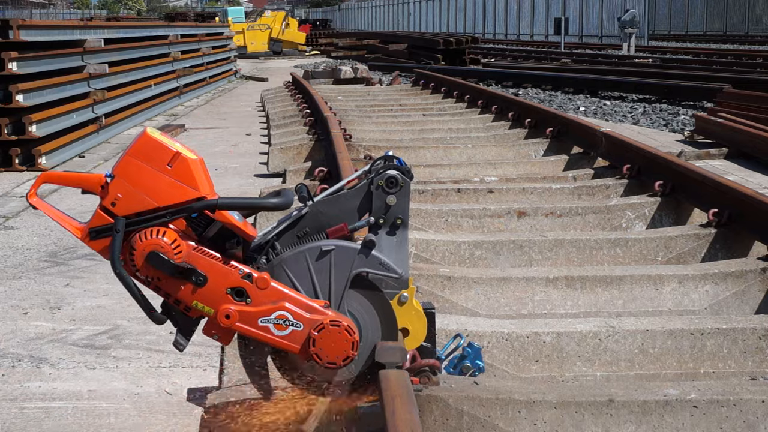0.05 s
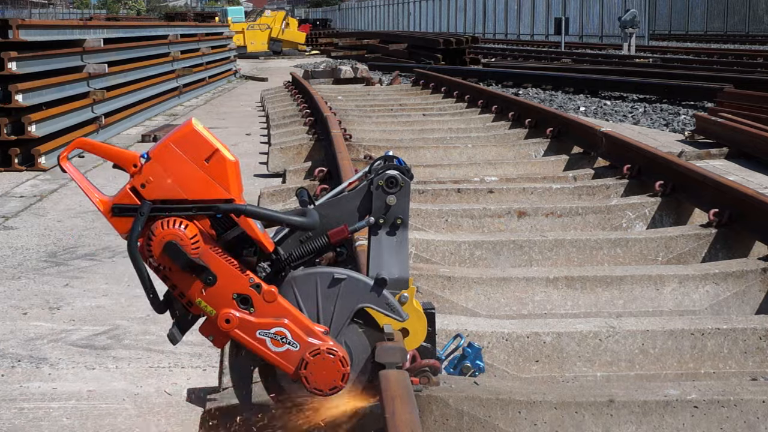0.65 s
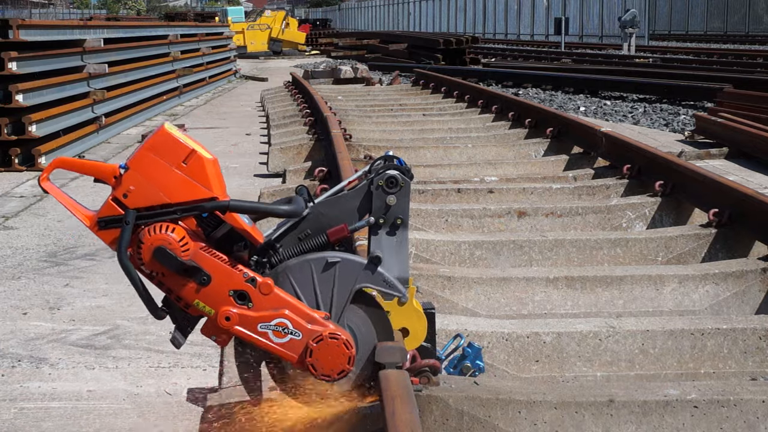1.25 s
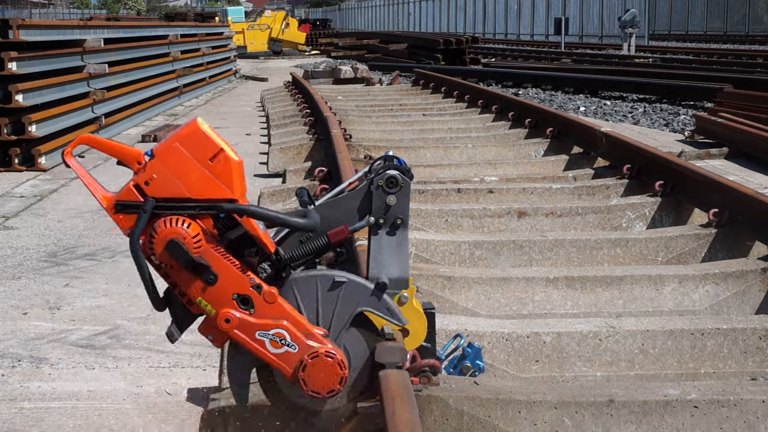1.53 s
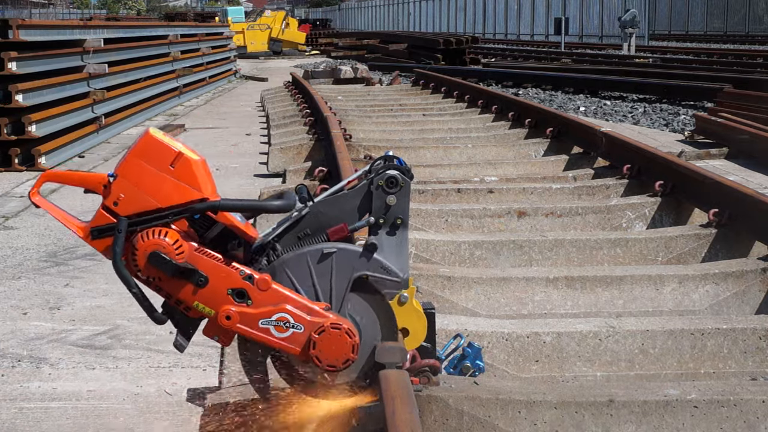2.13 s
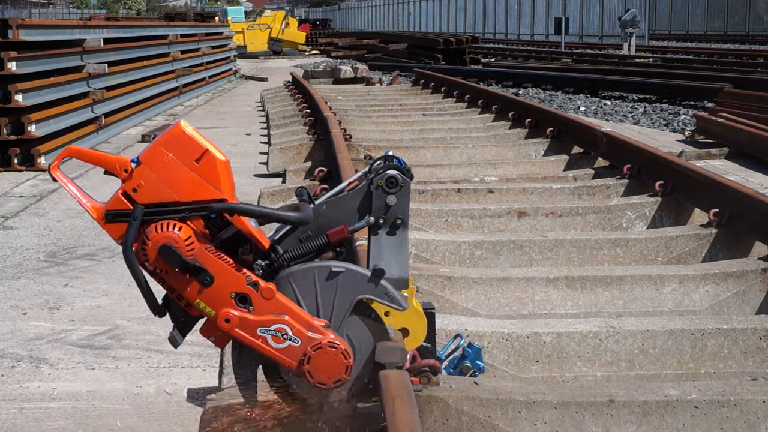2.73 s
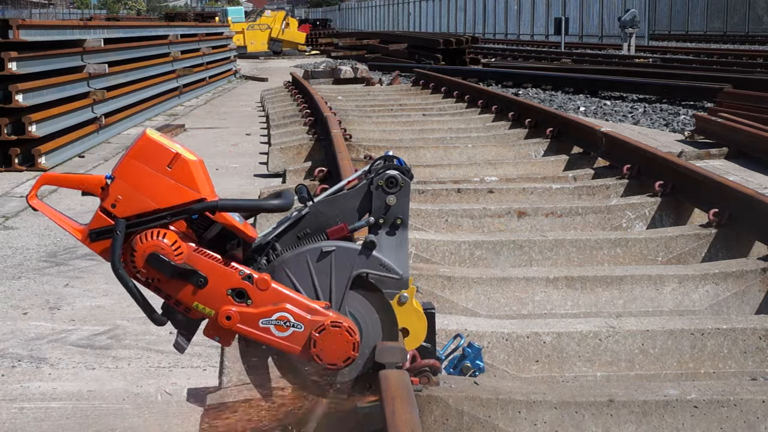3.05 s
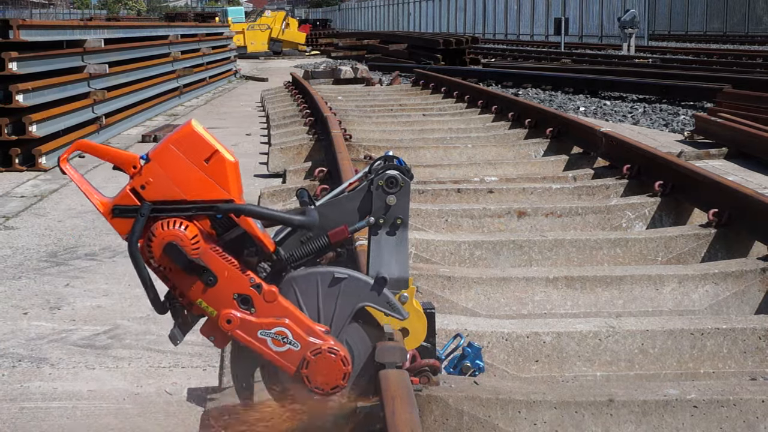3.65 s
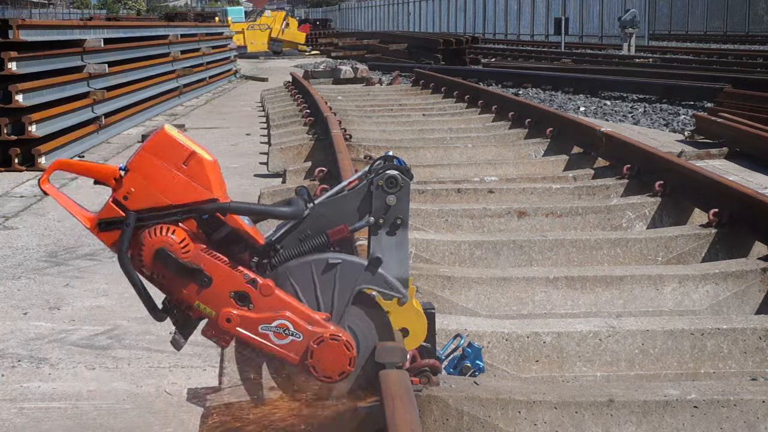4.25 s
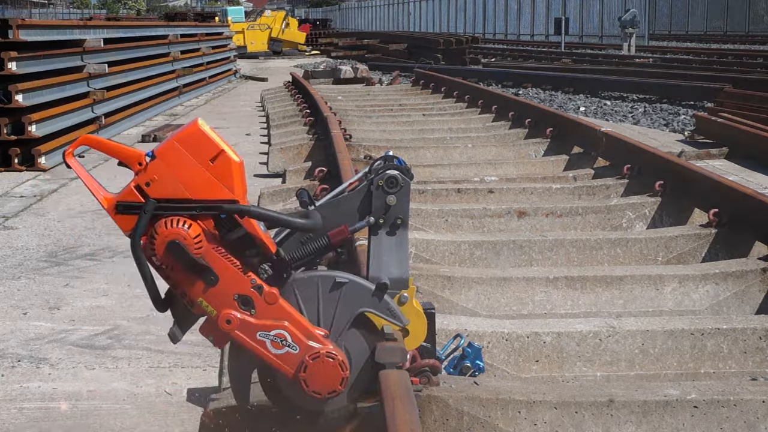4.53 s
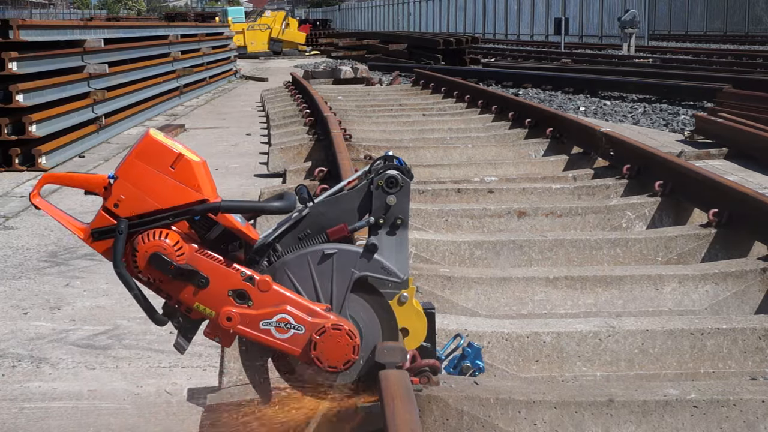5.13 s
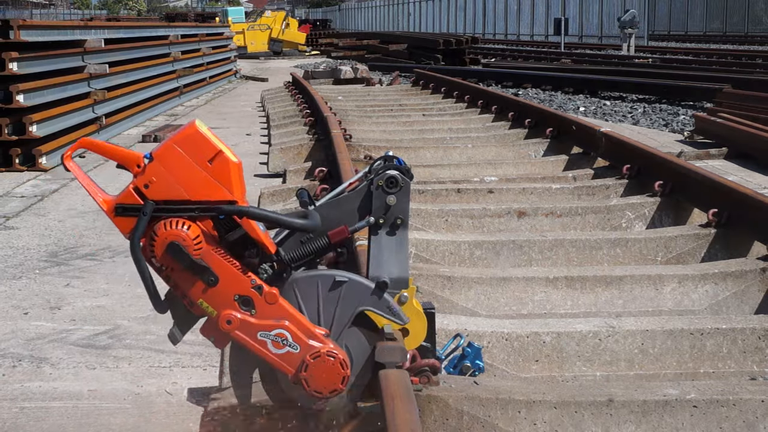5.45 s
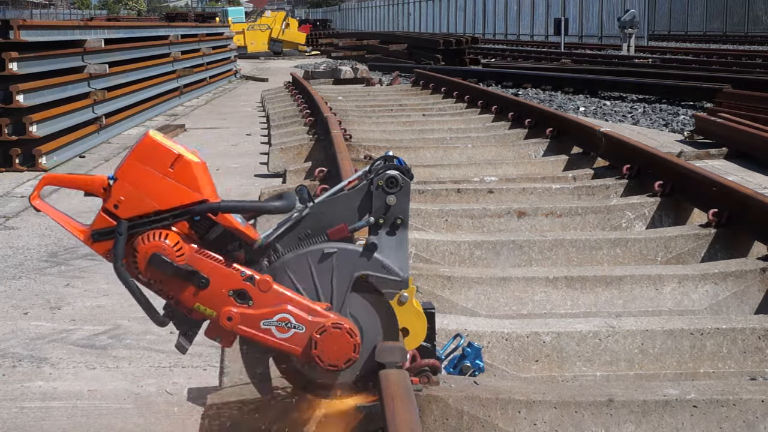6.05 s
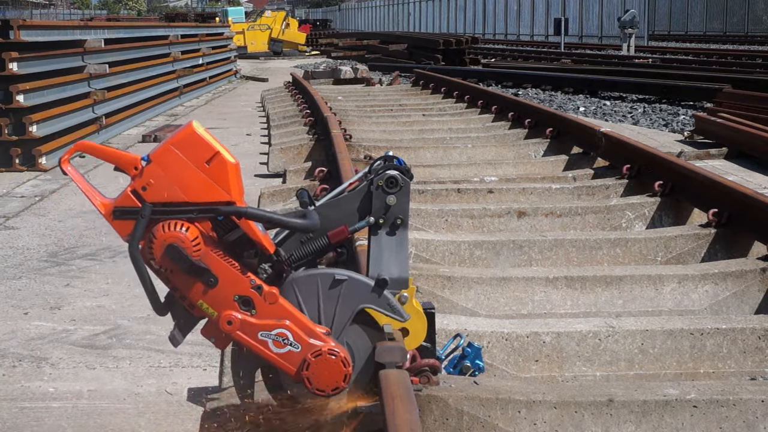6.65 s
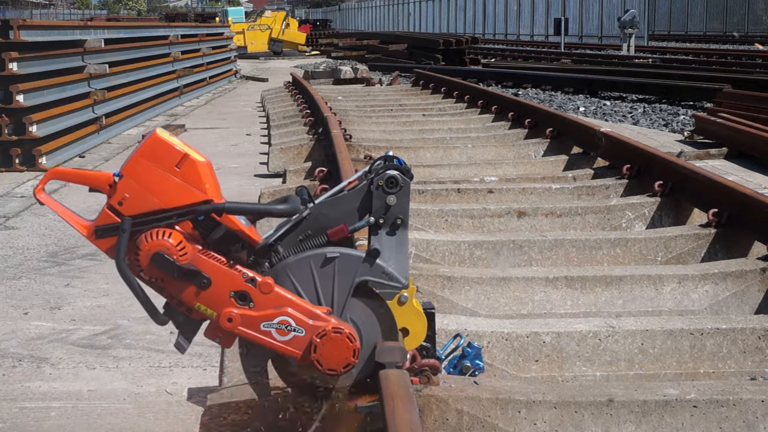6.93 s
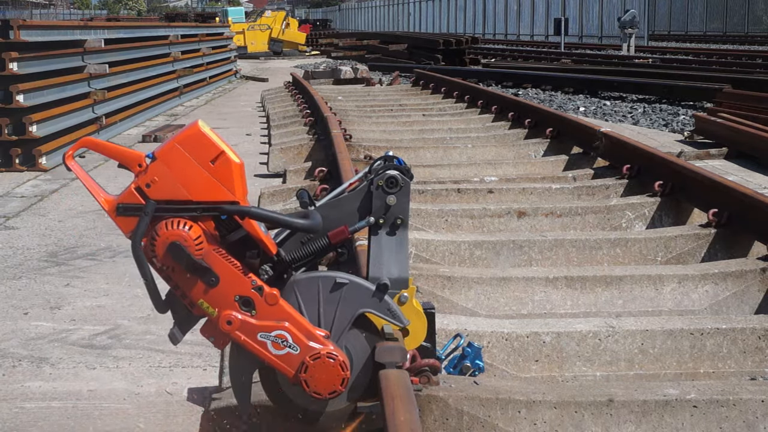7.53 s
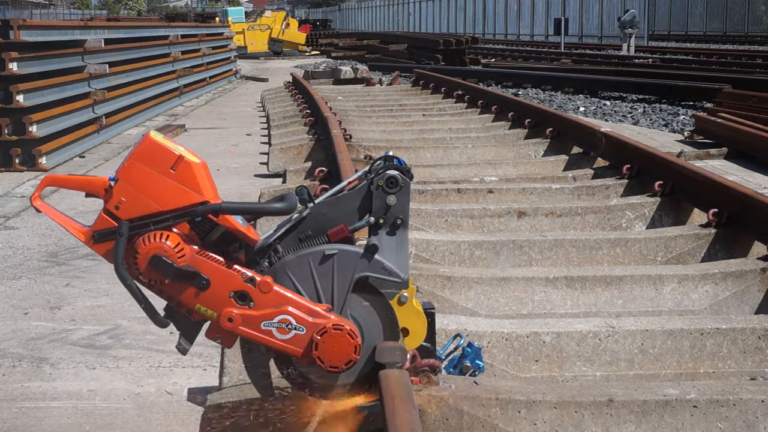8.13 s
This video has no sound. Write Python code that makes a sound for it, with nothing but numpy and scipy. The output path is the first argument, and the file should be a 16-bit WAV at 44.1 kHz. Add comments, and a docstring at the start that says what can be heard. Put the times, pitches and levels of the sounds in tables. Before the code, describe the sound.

A petrol rail saw runs at full throttle outdoors, its disc grinding through steel with a harsh hiss and brief squeals.

```python
"""Outdoors, a pair of microphones faces a two-stroke rail saw, a little to the left, with no echo.
It runs at full throttle while its abrasive disc is rocked through a steel rail, about a stroke a second.
The engine sags as the disc bites and picks up as it eases; each firing puffs gas through the muffler
and rattles the casing. The disc hisses, spits grit and sets the steel ringing, and now and then it
squeals against the wall of the cut. A faint open-air rumble lies underneath."""
import sys
import numpy as np
from scipy import signal
from scipy.fft import rfft, irfft
from scipy.io import wavfile

SR = 44100
rng = np.random.default_rng(int(sys.argv[2]) if len(sys.argv) > 2 else 0)


def output_pcm(signal):
    """Save a mono or channel-first signal as 16-bit PCM at the path in sys.argv[1].

    Samples are clipped to [-1, 1] before scaling.
    """
    pcm = np.clip(np.atleast_2d(signal).T, -1, 1) * 32767
    wavfile.write(sys.argv[1], SR, np.round(pcm).astype(np.int16))


N = 370440
TIME = np.arange(N) / SR
BIN_HZ = np.maximum(np.arange(N // 2 + 1) * SR / N, 1)
SIDES = np.array([[1], [-1]])   # left, right
STROKE_S, EASE_AT_S = 1.013, 0.396   # one rock to and fro; a moment when the disc eases off the rail


def from_db(db):
    """Decibels to gain."""
    return 10 ** (np.asarray(db) / 20)


def unit_rms(x):
    """Scale to unit power."""
    return x / np.sqrt(np.mean(x ** 2) + 1e-20)


def in_time(points):
    """Read a curve at every sample."""
    return np.interp(TIME, *np.transpose(points))


def at_bins(points):
    """Read a spectrum at every bin, on a log-frequency axis."""
    hz, value = np.transpose(points)
    return np.interp(np.log(BIN_HZ), np.log(np.maximum(hz, 1)), value)


def drift(rate_hz):
    """A smooth random curve of spread 1 that wanders up to about rate_hz."""
    count = N // 20
    hz = np.arange(count // 2 + 1) * SR / N
    slow = irfft(rfft(rng.standard_normal(count)) / (1 + (hz / rate_hz) ** 2), count)
    return np.interp(np.arange(N) / 20, np.arange(count), unit_rms(slow))


def swells(rows):
    """A bell-shaped rise or dip in dB around each event."""
    return sum(db * np.exp(-((TIME - s) / width) ** 2) for s, width, db in rows)


def sway(swing_db, lag, count=1):
    """Rise and fall in dB, count times a stroke, highest lag strokes after the disc eases."""
    return swing_db * np.cos(2 * np.pi * count * ((TIME - EASE_AT_S) / STROKE_S - lag))


def puffs(turns, lag, sharpness):
    """One smooth swell a turn, highest lag of the way round."""
    return unit_rms(np.exp(sharpness * np.cos(2 * np.pi * (turns - lag))))


def resonances(modes):
    """Frequency response of parallel resonances with alternating signs."""
    return sum((-1) ** k * from_db(db) / (1 + 1j * hz / width * (BIN_HZ / hz - hz / BIN_HZ))
               for k, (hz, width, db) in enumerate(modes))


# Balance across the pair. Each row: frequency in Hz, left microphone over right in dB.
MIC_BALANCE = [(60, 1), (150, 1), (450, 1), (600, 3), (1000, 1.5), (1700, 3), (2200, 1), (2500, 2.5),
               (2900, 0), (3500, 3), (5100, 5), (11000, 5)]
# Phase across the pair. Each row: frequency in Hz, lead of the left microphone in radians.
MIC_LEAD = [(0, 0.32), (260, -0.54), (860, -0.66), (2500, -0.5), (3190, 1), (3700, 0.21), (4820, 0.79),
            (5170, 0.12), (5860, 1), (6890, 0.16), (9990, 0.5), (11600, -0.15)]

def at_microphones(spectrum):
    """The saw stands to the left: each microphone hears it with its own level and phase."""
    gain = from_db(SIDES * at_bins(MIC_BALANCE) / 2)
    phase = np.exp(.5j * SIDES * at_bins(MIC_LEAD))
    return irfft(spectrum * gain * phase, N)


# How alike noise is at the two microphones. Each row: frequency in Hz, likeness from 0 to 1.
MIC_LIKENESS = [(60, 0.28), (160, 0.91), (400, 0.74), (1000, 0.89), (2700, 0.67), (4400, 0.6), (7000, 0.51),
                (11000, 0.37)]

def radiate(drive, response):
    """Noise, shaped in time by drive and in colour by response, reaches the pair at unit power."""
    mid, side = rfft(rng.standard_normal((2, N)) * drive)
    alike = at_bins(MIC_LIKENESS)
    pair = np.sqrt(1 + alike) * mid + np.sqrt(1 - alike) * side * SIDES
    return unit_rms(at_microphones(response * pair))


# Speed held against the feed, sinking as the cut deepens. Each row: time in seconds, firings a second.
FEED_SPEED = [(0, 149.3), (.73, 152), (.8, 150.2), (.99, 151.4), (1.52, 152), (1.83, 148.2), (2.14, 148.2),
              (2.7, 149.8), (2.79, 147.2), (3.06, 148.9), (3.66, 149.9), (3.8, 148.5), (4.15, 147.9),
              (4.65, 148.7), (5.2, 147.6), (5.65, 148.8), (5.82, 147.9), (6.65, 147.8), (6.8, 145.6),
              (8.4, 145.5)]

def crank_speed(lift_hz, ease_s, hunt_hz, hunt_rate_hz):
    """Firings per second: held down by the feed, lifted as the disc eases, and hunting a little."""
    from_ease_s = (TIME - EASE_AT_S + STROKE_S / 2) % STROKE_S - STROKE_S / 2
    easing = np.exp(-(from_ease_s / ease_s) ** 2)
    hunting = np.sin(2 * np.pi * hunt_rate_hz * TIME + drift(2.09))
    return in_time(FEED_SPEED) + lift_hz * easing + hunt_hz * hunting


LOAD_SPEEDS_HZ = (145.8, 148.8, 151.6)   # labouring, cutting steadily, running light
# The engine note. Each row: multiple of the firing rate, then level in dB at each of those three loads.
ENGINE_ORDERS = [(1.002, -50.0, -53.5, -51.5), (2.001, -45.0, -45.5, -39.5), (2.998, -33, -35.5, -35.5),
                 (4, -28.0, -27, -29.0), (5, -29, -35.5, -32.5), (6.004, -37.5, -44, -39.0),
                 (6.985, -35, -40.5, -42.5), (7.985, -35.5, -33, -29.5), (9.025, -41, -39.5, -43),
                 (10, -46, -37, -34), (11, -36.5, -25.5, -30.5), (12, -30.5, -29, -27),
                 (12.95, -38, -36.5, -41), (14, -46, -38, -31), (14.98, -37, -40, -36),
                 (16, -39.0, -48, -26), (17, -35.5, -42.5, -35), (18.1, -39, -41, -26),
                 (20, -33.5, -35, -41.0), (21, -38, -41, -50), (22, -41.5, -36.5, -39), (23, -41, -37, -39),
                 (24, -41, -44, -41.0), (25.02, -48, -37.5, -39), (25.95, -42.5, -38, -42),
                 (27.1, -40, -45, -43.0), (27.94, -46.0, -43, -44), (29.1, -44.0, -44.0, -43),
                 (30, -44.0, -45.0, -39.5), (30.8, -48, -47, -44), (32, -55, -47, -48.0),
                 (33, -48, -53.0, -55), (34.05, -49.0, -43, -43)]
HIGH_WHINE = (19, -27.5, -29.3, -35.5)   # one more such row, held by a ring of the saw
# Orders swell and fade as the engine tilts. Each row: multiple, swing in dB, lag in strokes.
ORDER_SWAYS = [(2, 1.6, 0.63), (3, 1.7, 0.64), (4, .6, .67), (6, 0, 0.84), (8, 3.5, 0.2), (9, 2, 0.64),
               (10, 0, .15), (11, 1.1, .7), (12, 0.7, 0.25), (13, 2, .1), (16, 1, 0.97), (17, 1.4, .06),
               (19, 2.3, .27), (20, 2, .1), (26, 2, .05)]
# The whine of the order that meets a ring of the casing. Each row: time in seconds, gain in dB.
WHINE_GAIN = [(0, 0.5), (1.7, -3), (2.1, -2), (3.1, -1.5), (3.6, 2.5), (4.1, -12), (4.5, 0.5), (5.6, 2.7),
              (6.1, 1.5), (6.6, 0), (8.4, -2)]
# A hard bite chokes the high orders. Each row: centre in seconds, half-length in seconds, gain in dB.
STUMBLES = [(.85, 0.045, -0.5), (2.79, 0.025, -3), (4.19, .035, -4)]

def engine_note(speed, turns, punch, whine_order, jitter_turns):
    """Harmonics of the firing pulse follow load and stroke; uneven firings roughen the high ones."""
    sways_db = {k: sway(swing_db, lag) for k, swing_db, lag in ORDER_SWAYS}
    sways_db[whine_order] += in_time(WHINE_GAIN)
    angle = 2 * np.pi * (turns + jitter_turns * drift(60))
    firing_db = 20 * np.log10(punch) + swells(STUMBLES)
    note = np.zeros(N)
    for k, *load_db in ENGINE_ORDERS + [HIGH_WHINE]:
        roughness = min(k / 10, 1)   # the low orders stay firm and clean
        db = np.interp(speed, LOAD_SPEEDS_HZ, load_db) + sways_db.get(k, 0)
        waver = np.interp(db, (-38, -28), (2.6, .8))   # weak orders waver, strong ones sing steadily
        db += roughness * firing_db + waver * np.sqrt(roughness) * drift(4)
        phase = 2.2 * rng.standard_normal()
        note += np.sqrt(2) * from_db(db) * np.cos(k * angle + phase)
    return at_microphones(rfft(note))


# The roar at the muffler. Each row: time in seconds, level in dB before the roar's gain.
ROAR_LEVEL = [(0, -24.5), (.2, -24), (.35, -26.5), (1.1, -25.5), (2.3, -26), (3.2, -26), (4.2, -25),
              (4.45, -26.8), (5, -26), (6.15, -24.4), (6.8, -26), (8.4, -25)]
# Colour of the gas. Each row: frequency in Hz, relative level in dB.
GAS_SPECTRUM = [(120, -50), (220, -32), (330, -15.5), (520, -8.5), (760, -1), (900, -1), (1030, 2.5),
                (1250, -0.5), (1480, -6), (2000, -5), (3000, -14.5), (6000, -35)]

def exhaust_gas(turns, strain, roar_gain_db, rush_db, flutter_db, split_hz):
    """Each opening of the exhaust port lets out a puff of turbulent gas: a low roar, a brighter rush."""
    colour = from_db(at_bins(GAS_SPECTRUM))
    low_share = 1 / (1 + (BIN_HZ / split_hz) ** 8)
    flow = puffs(turns, lag=0.19, sharpness=0.54)
    roar = radiate(flow * from_db(flutter_db * drift(23)), colour * np.sqrt(low_share))
    rush = radiate(flow * strain, colour * np.sqrt(1 - low_share))
    return from_db(in_time(ROAR_LEVEL) + roar_gain_db) * roar + from_db(rush_db) * rush


# Rings of the casing. Each row: frequency in Hz, width in Hz, relative level in dB.
CASING_MODES = [(1638, 21, 6), (1808, 90, -0.5), (2113, 89, -0.5), (2440, 106, -2), (2660, 99, -4.5),
                (2677, 320, -2), (3010, 140, -11)]

def casing_rattle(turns, strain, level_db):
    """The firings knock the muffler shell and the covers into a short ring."""
    knocks = puffs(turns, lag=0, sharpness=1.3) * strain
    return from_db(level_db) * radiate(knocks, resonances(CASING_MODES))


# Pressure of the disc on the rail. Each row: time in seconds, base level of hiss and rings in dB.
BITE_LEVEL = [(0, -24), (.5, -25), (1.1, -25.4), (2.1, -25), (2.4, -24.5), (3.5, -24.1), (4, -24.5),
              (4.4, -26), (4.75, -25), (5.5, -25.5), (6.15, -25.5), (6.4, -24.5), (7.2, -24.5), (7.5, -24),
              (7.9, -25), (8.4, -24)]
# Colour of the hiss at the cut. Each row: frequency in Hz, relative level in dB.
HISS_SPECTRUM = [(700, -28.5), (1500, -8), (2400, -0.5), (3300, -3), (4200, 0), (4900, -3), (5600, -2),
                 (6400, -5), (7300, -4.5), (8300, -9), (9700, -7), (11200, -14.5)]
# Three ringing bands of the steel. Each row: frequency in Hz, width in Hz, relative level in dB.
LOW_RING = [(3370, 440, 1.5), (3716, 130, -1), (3897, 140, -2.5)]
MID_RING = [(5180, 150, 0), (5520, 380, 0)]
HIGH_RING = [(6940, 430, -1), (7100, 290, 1.5)]
# The disc's edge catches and the high ring sizzles.
# Each row: centre in seconds, half-length in seconds, gain in dB.
SIZZLES = [(.88, .05, 11), (1.3, .07, 6), (2.05, .1, 5), (3.97, 0.067, 6), (4.63, .07, 3), (4.92, .1, 8),
           (5.42, .12, 3), (6.4, .13, 2), (6.98, .06, 7), (7.42, 0.081, 8)]

def grinding(turns, belt_ratio, hiss_gain_db, ring_gains_db, wander_db):
    """Grains tear at the rail, a little harder once a turn of the belt-driven disc and at each firing."""
    judder_db = 0.45 * drift(8.4)
    bite_db = in_time(BITE_LEVEL) + judder_db + sway(0.36, lag=0.46, count=2)   # bites out and back
    throb = puffs(turns * belt_ratio, lag=0, sharpness=0.031)
    surge = puffs(turns, lag=0.15, sharpness=0.12)
    chatter_db, grit_db = 0.99 * drift(34), 0.86 * drift(700)
    contact = throb * surge * from_db(chatter_db + grit_db)
    cut = from_db(bite_db + hiss_gain_db) * radiate(contact, from_db(at_bins(HISS_SPECTRUM)))
    flares_db = (sway(1.8, lag=0.66), sway(1.0, lag=.2), swells(SIZZLES))
    for modes, gain_db, flare_db in zip((LOW_RING, MID_RING, HIGH_RING), ring_gains_db, flares_db):
        ring_db = bite_db + gain_db + flare_db + wander_db * drift(2.7)
        cut += from_db(ring_db) * radiate(contact, resonances(modes))
    return cut


# The open air around the microphones. Each row: frequency in Hz, relative level in dB.
AIR_SPECTRUM = [(20, -4), (45, -7), (90, -9), (130, 14), (220, 7.5), (600, -11)]

def open_air(level_db, rolloff_hz):
    """A faint, steady rumble lies under the saw."""
    colour = from_db(at_bins(AIR_SPECTRUM)) / (1 + (BIN_HZ / rolloff_hz) ** 2)
    return from_db(level_db) * radiate(1, colour)


# Snags in the cut. Each row: centre in seconds, half-length in seconds, gain in dB.
SNAGS = [(0.075, .03, 2), (1.27, .03, 3), (3.45, 0.046, 0), (6.983, 0.018, 8), (7.193, 0.033, 3)]

def snagging(punch):
    """The disc snags and the firings briefly hit harder."""
    return punch * from_db(swells(SNAGS))


# Squeals from the cut. Each row: centre in seconds, half-length in seconds, pitch in Hz, level in dB.
SQUEALS = [(1.07, .06, 3420, -29), (1.25, 0.14, 3350, -36), (3.18, 0.12, 3875, -30), (4.25, .08, 3715, -35),
           (4.8, .18, 3320, -33), (5.62, 0.19, 5080, -32), (7.42, .15, 6130, -37)]

def squealing(width_hz):
    """The disc rubs the wall of the cut: a narrow, unsteady ring of the steel swells and dies."""
    squeals = np.zeros(N)
    for centre_s, half_s, hz, db in SQUEALS:
        angle = 2 * np.pi * hz * TIME
        ring = drift(width_hz) * np.cos(angle) + drift(width_hz) * np.sin(angle)
        squeals += from_db(db) * np.exp(-((TIME - centre_s) / half_s) ** 2) * ring
    return at_microphones(rfft(squeals))


def scene():
    """The saw as the pair hears it: one crankshaft times the note, gas, rattle and grinding."""
    speed = crank_speed(lift_hz=1.5, ease_s=.114, hunt_hz=.28, hunt_rate_hz=7.5)
    turns = np.cumsum(speed) / SR
    punch = from_db(1.03 * drift(31))   # no two firings are equally strong
    strain = snagging(punch)
    note = engine_note(speed, turns, punch, whine_order=12, jitter_turns=.0015)
    gas = exhaust_gas(turns, strain, roar_gain_db=1.5, rush_db=-28.0, flutter_db=0.8, split_hz=1400)
    rattle = casing_rattle(turns, strain, level_db=-28.5)
    cut = grinding(turns, belt_ratio=.51, hiss_gain_db=2.5, ring_gains_db=(-6, -10, -14), wander_db=1.75)
    return note + gas + rattle + cut + squealing(width_hz=24) + open_air(level_db=-59.5, rolloff_hz=800)


def record(dry):
    """After the microphones, the rare highest peaks are rounded and the top is cut steeply."""
    ceiling, cutoff_hz = .85, 11150
    rounded = dry / (1 + (dry / ceiling) ** 8) ** (1 / 8)
    return signal.sosfilt(signal.ellip(16, .05, 90, cutoff_hz, fs=SR, output="sos"), rounded)


dry = scene()
out = record(dry)
output_pcm(out)
```